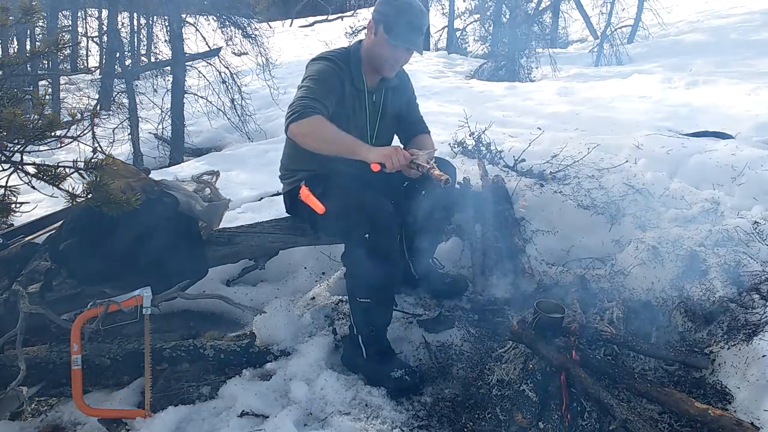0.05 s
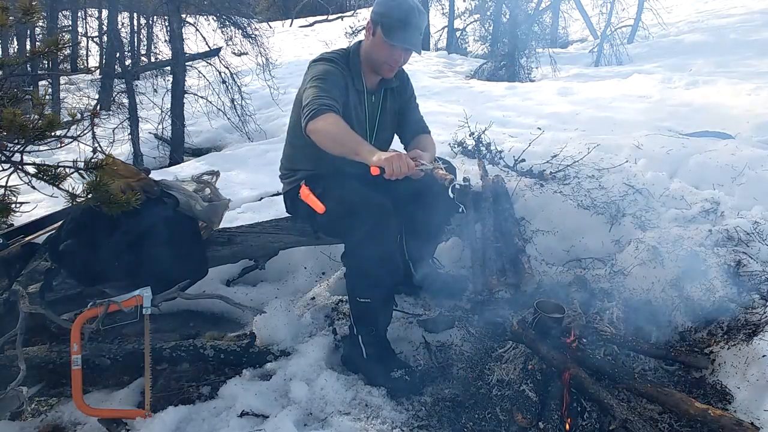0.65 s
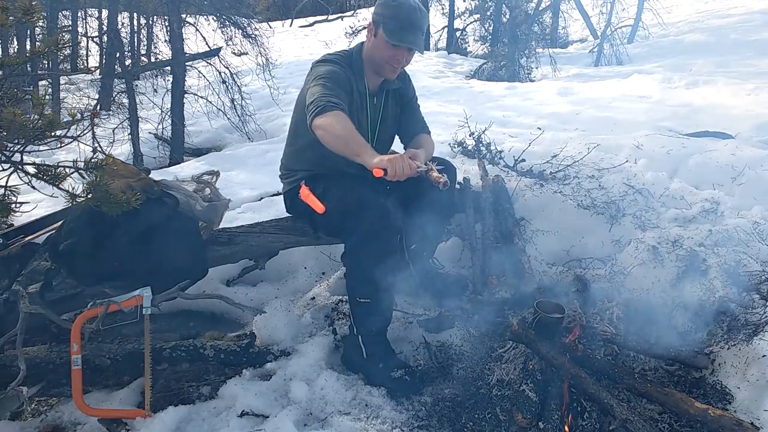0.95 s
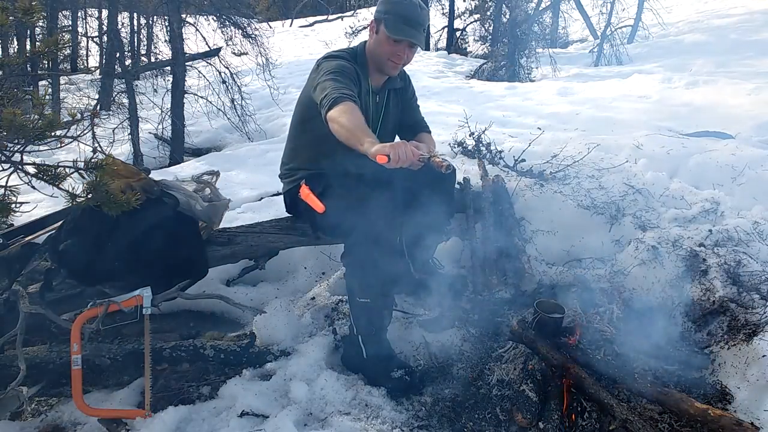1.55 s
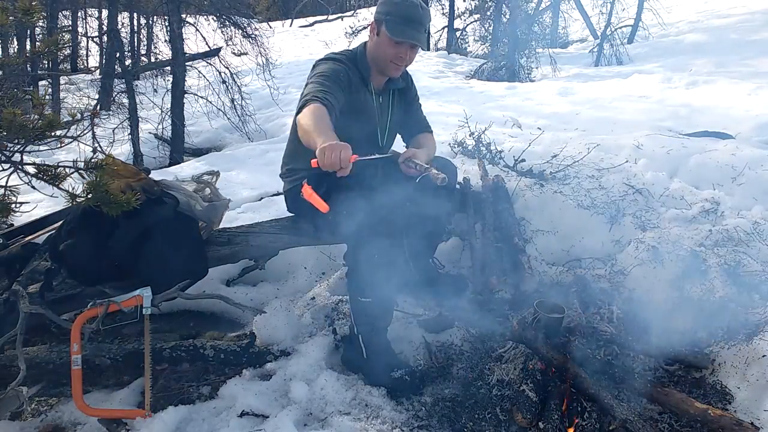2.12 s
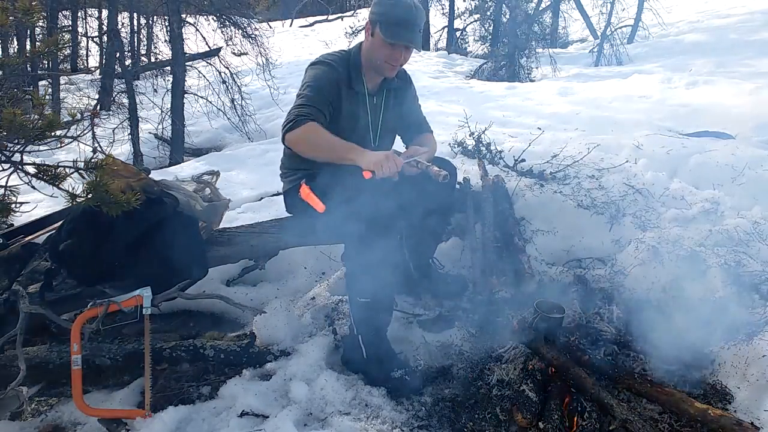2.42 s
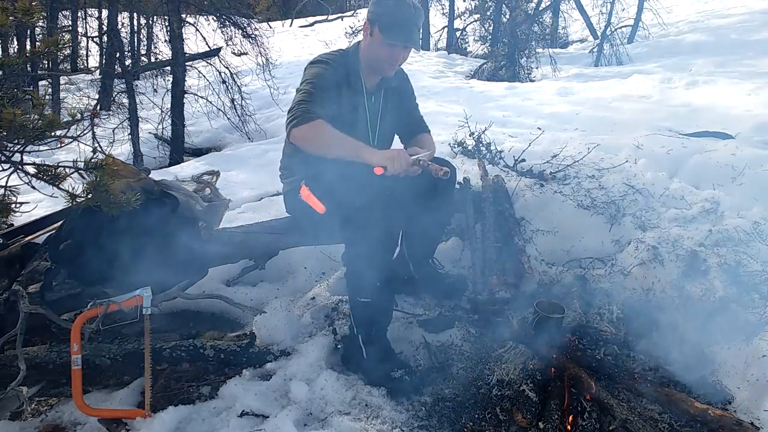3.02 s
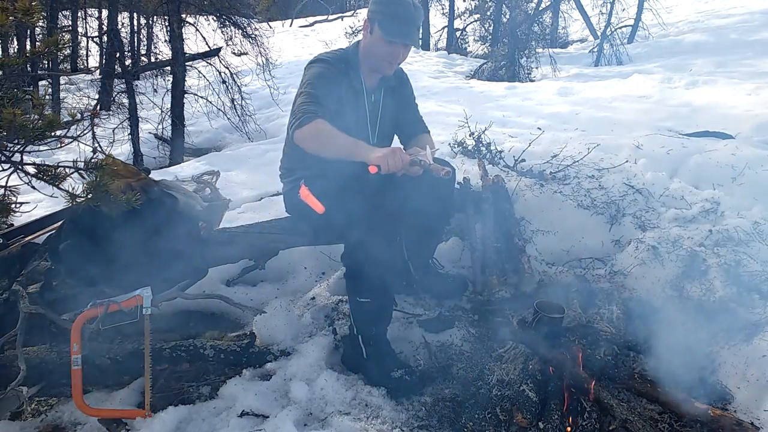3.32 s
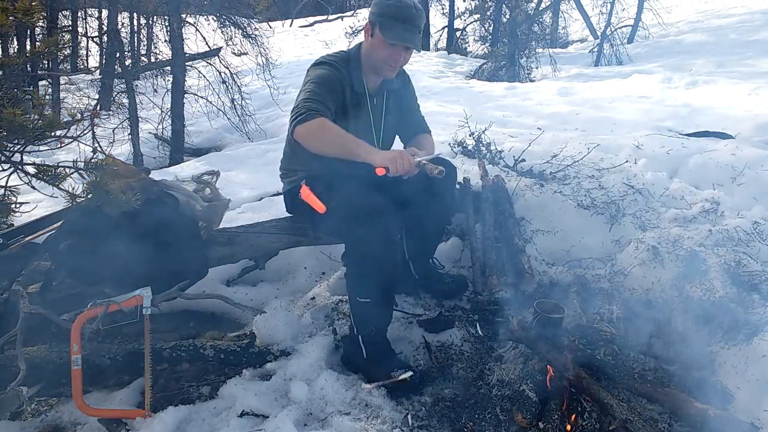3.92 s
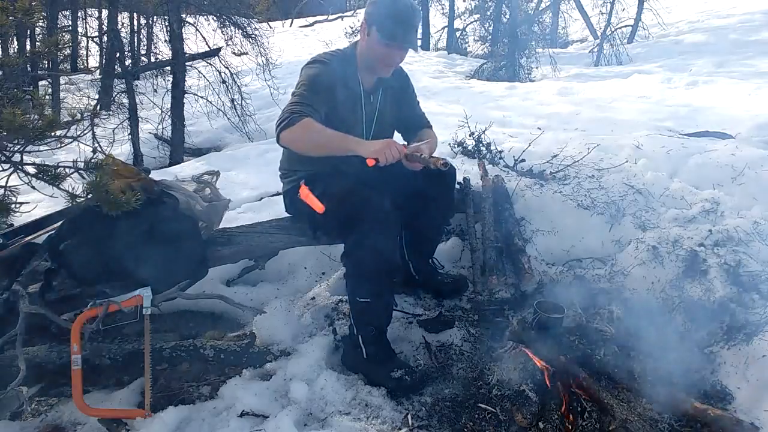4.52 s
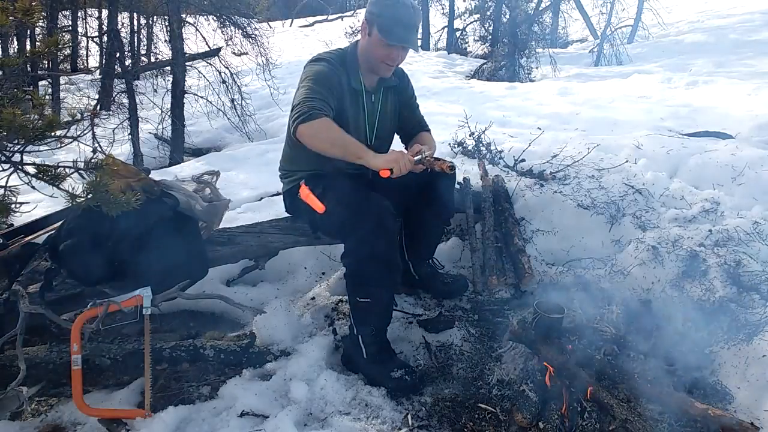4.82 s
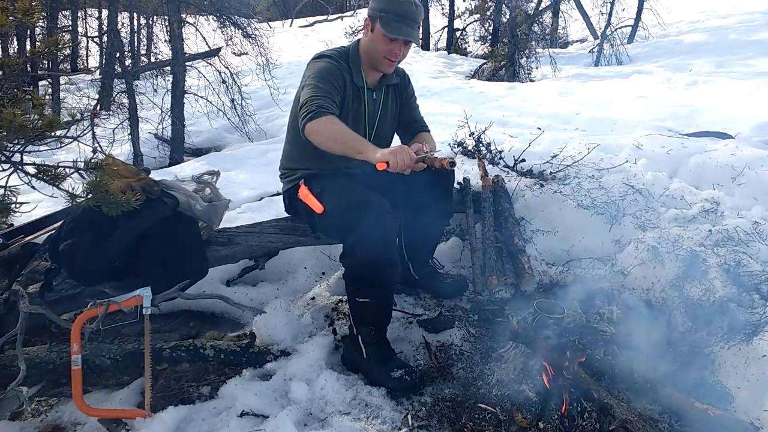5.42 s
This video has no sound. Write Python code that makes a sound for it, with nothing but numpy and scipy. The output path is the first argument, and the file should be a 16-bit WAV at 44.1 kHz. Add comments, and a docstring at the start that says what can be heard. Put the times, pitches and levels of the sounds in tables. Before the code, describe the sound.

Close to the microphone, a knife catches and slips along a wooden pole, making short hissing scrapes and dry knocks with pauses between them. Behind it runs the low, steady rush of a campfire in the open air, dotted with little pops. After a few light strokes a log splits with a loud snap, far above everything else, and the background briefly dips. Firmer strokes follow, and trousers rustle softly once.

```python
"""A knife knocks and scrapes on a wooden pole, shaving off bark over the soft rush of a campfire.
The blade sticks and slips: tearing fibres hiss, and the pole knocks, springs back and rings.
Pockets of steam pop in the fire, and the carver's trousers rustle once. Early on a log splits
with one loud crack, which makes a limiter turn everything down for about a second."""
import sys
import numpy as np
from scipy import signal
from scipy.fft import rfft, irfft
from scipy.io import wavfile
from scipy.ndimage import uniform_filter1d, minimum_filter1d

SR = 44100
rng = np.random.default_rng(int(sys.argv[2]) if len(sys.argv) > 2 else 0)


def transcribe(signal):
    """Save signal, clipped to [-1, 1], as a 16-bit WAV file at the path in sys.argv[1]."""
    frames = np.atleast_2d(signal).T
    limited = np.clip(frames, -1, 1)
    pcm = np.round(limited * 32767).astype(np.int16)
    wavfile.write(sys.argv[1], SR, pcm)


N = 244743
SIZE = 16384  # samples in one short sound
HZ, T = np.fft.rfftfreq(SIZE, 1 / SR), np.arange(SIZE) / SR

# the rush of flames and air: f/Hz, level/dB per Hz
AIR_SPECTRUM = [(20, -100), (60, -87.5), (130, -76.5), (250, -82), (450, -88), (1100, -91.5), (1800, -95),
                (2600, -92.5), (4000, -99), (8000, -101), (12000, -104.5), (15400, -105.5), (15800, -140)]
# how much the rush drifts: f/Hz, weight
AIR_DRIFT = [(1500, 0.55), (6000, 0.42)]
# how closely its left and right sides are linked: f/Hz, link from 0 to 1
AIR_LINK = [(40, 0.74), (150, 0.55), (400, 0.22), (1200, 1.0), (2500, 1.0), (5000, 0.65),
            (7500, 0.68), (11000, 0.23)]
# how much louder it is on the right: f/Hz, level/dB
AIR_BALANCE = [(300, 0.72), (4000, 0.99), (8000, 1), (13000, 2.5)]
# near sounds at two microphones: f/Hz, left's phase lead/rad, left over right level/dB
MIC_RESPONSE = [(0, -4.5, 0), (111, -1.53, -6), (279, 0.5, 4.5), (700, -0.23, 2.5), (1150, 0, -0.5),
                (1790, 0.38, -7.5), (2167, 2.5, -6), (2355, 3, 1), (3070, 5, 2), (3900, 7, 1.5),
                (5410, 10, 3), (6500, 13, 2.5), (7500, 15.5, 0), (9830, 20.5, 5.5), (16700, 34.5, -8)]
# steam pops: t/s, level/dB, ring f/Hz, fizz level/dB against the ring
STEAM_POPS = [(0.799, -39.5, 6000, -5), (1.0671, -32, 6130, -6), (1.250, -41.5, 6000, 0.5),
              (1.633, -46, 6000, -4), (1.898, -37.5, 3870, -7), (2.070, -11, 1130, -20),
              (2.122, -42, 5000, 0.5), (2.53, -36, 1420, -2.5), (2.629, -37.5, 680, -21),
              (3.258, -35.5, 4630, 0.5), (3.438, -34.5, 4500, -1.5), (4.634, -44.5, 1220, -1),
              (5.068, -43.5, 1620, -12), (5.3165, -31.5, 3600, 1)]
# the tone of a splitting log: f/Hz, level/dB
CRACK_SPECTRUM = [(50, -38), (130, -15), (220, 0), (330, 2.5), (680, 9.5), (1400, 10), (2100, 2),
                  (3100, 5.5), (4500, -5.5), (6200, 0), (8000, 6), (11500, 1.5), (15500, -10.5)]
# the pole's dull body: f/Hz, level/dB
WOOD_SPECTRUM = [(30, -48), (150, -17.5), (300, -7.5), (480, -2.5), (800, -3), (1400, -3), (2000, -8),
                 (2400, -10), (2900, -16), (3800, -24.5), (5000, -20), (9000, -56), (16000, -40)]
# the notes the pole rings at: f/Hz, width/Hz, level/dB over its body
POLE_NOTES = [(504.5, 27, 5), (600, 27, 11), (722, 48, 5.5), (930, 62, 3), (1218.5, 26, 10.5),
              (1420, 63, 2.5), (1530, 51, -5), (1736, 67, 6.5), (2100, 49, 8.5), (3020, 230, 9.5),
              (3610, 210, 11.5)]
# the hiss of tearing fibres: f/Hz, level/dB
FIBRE_SPECTRUM = [(40, -52), (400, -27), (1200, -9.5), (2400, 0.5), (3300, 2.5), (4300, 1.5), (5500, -2.5),
                  (6100, 0.5), (7200, -2), (9000, -2), (12500, -4.5), (15200, -6), (16000, -27)]
# the blade slides along: peak t/s, rise/s, wood level/dB, fibre level/dB, boosted f/Hz
BLADE_SHAVES = [(.212, .022, -50, -52, 620), (.514, .021, -44, -46, 1300), (.955, .006, -52, -50.5, 1200),
                (2.029, .017, -24, -45.5, 1220), (2.718, 0.038, -48, -46.5, 1400),
                (2.779, .03, -33, -38.5, 1260), (3.129, .015, -39.5, -39.5, 1430),
                (3.341, .004, -55, -44.5, 1880), (3.546, .021, -31, -45.5, 580),
                (4.034, .017, -38, -39, 1240), (4.83, .03, -57.5, -60, 1190),
                (4.950, .01, -48, -43.5, 1200), (5.493, .021, -26.5, -43.5, 1280),
                (5.519, .012, -43.5, -43.5, 1430)]
# the edge catches and a splinter snaps: t/s, wood level/dB, fibre level/dB
BLADE_CATCHES = [(.207, -52, -45), (.531, -38, -38), (.966, -39.5, -38.5), (1.101, -66, -42.5),
                 (2.012, -26, -22.5), (2.681, -47, -38.5), (2.729, -48, -43), (2.760, -33, -29),
                 (3.165, -44, -42), (3.503, -49, -47), (3.522, -32.5, -29.5), (4.011, -38, -41.5),
                 (4.047, -43, -34), (4.791, -48.5, -47), (5.457, -25, -33), (5.472, -36, -43),
                 (5.487, -24, -38)]
# the blade jolts the pole: t/s, level/dB, tilt/dB per octave, boosted f/Hz, rebound's boosted f/Hz
POLE_KNOCKS = [(.1805, -38, -6, 607, 620), (.864, -41.5, -.5, 1190, 1180), (.9705, -28, -4.5, 620, 606),
               (2.651, -48.5, -3, 1210, 600), (3.073, -21.5, 2, 1650, 600), (3.1675, -34.5, -.5, 1260, 577),
               (3.4645, -39, -4, 600, 915), (3.946, -44.5, -10.5, 450, 450), (4.052, -16.3, 6, 1900, 490),
               (4.680, -51.5, 1, 490, 490), (4.954, -36.5, -4.5, 940, 430), (5.308, -43.5, -2.5, 600, 720)]


def amp(db):
    """Turns decibels into a gain."""
    return 10 ** (np.asarray(db) / 20)


def unit_rms(x):
    """Scales a signal to an average power of 1."""
    return x / np.sqrt(np.mean(x ** 2) + 1e-20)


def curve(points, hz):
    """Joins a table's points along a log-frequency axis."""
    f, value = np.transpose(points)
    return np.interp(np.log(hz + 1), np.log(f + 1), value)


def add(mix, s, sound):
    """Mixes a sound in, starting at s seconds."""
    start = round(s * SR)
    sound = sound[max(-start, 0):]
    part = mix[max(start, 0):][:len(sound)]
    part += sound[:len(part)]


def colour(x, db):
    """Sets the level of each frequency so that notes ring after a blow, never before."""
    cepstrum = irfft(np.log(amp(db)))
    cepstrum[1:SIZE // 2] *= 2
    cepstrum[SIZE // 2 + 1:] = 0
    return irfft(rfft(x) * np.exp(rfft(cepstrum)))


def slips(per_s, spread_db, smear):
    """Surfaces stick and slip: tiny uneven clicks over smooth rubbing."""
    sizes = amp(spread_db * np.minimum(rng.exponential(1, SIZE), 3)) * rng.choice([-1, 1], SIZE)
    clicks = sizes * (rng.random(SIZE) < per_s / SR)
    return unit_rms(clicks) + smear * rng.standard_normal(SIZE)


def rub(drive, body_db, smooth_hz=350):
    """Slips shake a body: their own tone is evened out and the body's takes over."""
    power = uniform_filter1d(abs(rfft(drive)) ** 2, size=max(int(smooth_hz / HZ[1]), 1))
    return unit_rms(colour(drive, body_db - 10 * np.log10(abs(power) + 1e-9)))


def microphones(x):
    """A near sound reaches left and right with a shift in phase and level."""
    f, lead, balance_db = np.transpose(MIC_RESPONSE)
    lead, balance_db = np.interp(HZ, f, lead), np.interp(HZ, f, balance_db)
    pair = irfft([amp(balance_db / 2), amp(-balance_db / 2) * np.exp(-1j * lead)])
    middle = SIZE // 2 + 1
    return signal.fftconvolve(x[None], np.roll(pair, middle, axis=1), axes=1)[:, middle:middle + N]


def echoes(x, db, t60, low_hz):
    """A spray of reflections, different on each side, fading by 60 dB in t60 seconds."""
    taps = rng.standard_normal((2, SIZE)) * amp(-60 * T / t60) * (1 - np.exp(-T / (t60 / 20)))
    bass_cut = signal.butter(1, low_hz, "high", fs=SR, output="sos")
    taps = signal.sosfilt(bass_cut, taps / np.linalg.norm(taps[0]))
    return amp(db) * signal.fftconvolve(x[None], taps, axes=1)[:, :N]


def air(patch_depth=2.5, swell_depth=2.0, comb_hz=2500):
    """Flames and open air make a soft rush that drifts in patches."""
    frames, hz = N // 256 + 5, np.fft.rfftfreq(1024, 1 / SR)
    a, b, c, d, patches = rng.standard_normal((5, frames, len(hz)))
    patches = unit_rms(uniform_filter1d(uniform_filter1d(patches, size=9, axis=0), size=12, axis=1))
    swell = unit_rms(uniform_filter1d(rng.standard_normal(frames), size=50))[:, None]
    # the rush is alike, then opposite, at the two sides from band to band
    alike = -np.cos(2 * np.pi * hz / comb_hz) * curve(AIR_LINK, hz)
    left = a + 1j * b
    right = alike * left + np.sqrt(1 - alike ** 2) * (c + 1j * d)
    drift_db = curve(AIR_DRIFT, hz) * (patch_depth * patches + swell_depth * swell)
    side_db = np.array([-.5, .5])[:, None, None] * curve(AIR_BALANCE, hz)
    spectra = np.array([left, right]) * amp(curve(AIR_SPECTRUM, hz) + drift_db + side_db)
    _, rush = signal.istft(spectra.swapaxes(1, 2), nperseg=1024, noverlap=768)
    return np.sqrt(SR * 3 / 2048) * rush[:, :N]


def trousers(s=4.27, db=-61, hz=1150):
    """Cloth rustles softly as the carver shifts his leg."""
    cloth_db = -10 * np.log10(1 + (np.log2((HZ + 1) / hz) / 0.41) ** 4)
    rustle = rub(slips(per_s=600, spread_db=3, smear=0.68), cloth_db)
    out = np.zeros(N)
    add(out, s, amp(db) * rustle * signal.windows.tukey(SIZE, .7))
    return out


def pop(db, ring_hz, t60, fizz_db, fizz_s=0.0016, snap_db=-9, snap_hz=3700, soft_hz=9000):
    """A pocket of steam bursts: charred wood snaps, the hollow rings and steam fizzes."""
    t = T[:SIZE // 8]
    ring = np.sin(2 * np.pi * ring_hz * t) * amp(-60 * t / t60)
    snap = np.sin(2 * np.pi * snap_hz * t) * np.exp(-t / 0.00035)
    fizz = rng.standard_normal(len(t)) * np.exp(-t / fizz_s)
    burst = ring + amp(snap_db) * snap + amp(fizz_db) * fizz
    return amp(db) * signal.lfilter(*signal.butter(1, soft_hz, fs=SR), burst)


def crack(energy_db=16, gap_s=0.0001116, second_db=-5, spit_db=-38, spit_s=0.00098):
    """A log splits in two quick snaps and spits a little steam."""
    spit = amp(spit_db) * rng.standard_normal(SIZE) * np.exp(-T / spit_s)
    snaps = irfft(1 - amp(second_db) * np.exp(-2j * np.pi * HZ * gap_s))
    sound = colour(snaps + spit, curve(CRACK_SPECTRUM, HZ))
    return amp(energy_db) * sound / np.linalg.norm(sound)


def fire(ticks=60, faint_db=-56):
    """Burning logs give one loud crack, clear pops and faint ticks at random times."""
    out = np.zeros(N)
    add(out, 1.3837, crack())
    for s, db, hz, fizz_db in STEAM_POPS:
        t60 = 0.0089 * (hz / 1000) ** -0.74  # smaller hollows ring higher and die sooner
        add(out, s, pop(db, hz, t60, fizz_db))
    for when, size, pitch in rng.random((ticks, 3)):
        add(out, when * N / SR, pop(faint_db + 11 * size ** 2, 900 * 8 ** pitch, t60=.003, fizz_db=-20))
    return out


def bite(mix, s, rise_s, fall_s, wood_db, fibre_db, tilt, pitch_hz, early_s=0):
    """Adds one bite of the blade: a swell of slips shakes the pole and another tears its fibres."""
    peak_s = SIZE // 3 / SR
    t = T - peak_s
    force = np.exp(-np.maximum(-t / rise_s, t / fall_s) ** 1.27)
    # the tearing stops first, as the shaving comes free
    tear = np.exp(-np.maximum(-(t + early_s) / rise_s, (t + early_s) / (0.85 * fall_s)) ** 1.32)
    notes = sum(amp(db) ** 2 / (1 + (2 * (HZ - hz) / width) ** 2) for hz, width, db in POLE_NOTES)
    pole_db = curve(WOOD_SPECTRUM, HZ) + 10 * np.log10(1 + notes)
    pole_db += tilt * np.log2(np.clip(HZ, 250, 2500))
    # where the blade sits on the pole decides which notes are boosted
    boost_db = 6 * np.exp(-(np.log2((HZ + 1) / pitch_hz) / 0.18) ** 2)
    wood = rub(force * slips(per_s=1500, spread_db=3, smear=0.35), pole_db + boost_db)
    # a hard tear lifts coarser splinters, which sound darker
    coarse_db = 0.23 * (fibre_db + 39.5) * np.log2(np.maximum(HZ, 3000))
    hiss_db = curve(FIBRE_SPECTRUM, HZ) - coarse_db + boost_db
    fibre = rub(tear * slips(per_s=900, spread_db=5.3, smear=0.35), hiss_db, smooth_hz=1220)
    sound = amp(wood_db) * wood + amp(fibre_db) * fibre
    add(mix, s - peak_s, sound * np.sqrt(np.mean(force ** 2)))


def knife(knock_rise_s=.0018, knock_fibre_db=-29, rebound_s=.0075):
    """The blade shaves, catches and knocks; after each knock the pole springs back in the hand."""
    out = np.zeros(N)
    for s, rise_s, wood_db, fibre_db, hz in BLADE_SHAVES:
        bite(out, s, rise_s, .014, wood_db, fibre_db, tilt=.3, pitch_hz=hz, early_s=.0038)
    for s, wood_db, fibre_db in BLADE_CATCHES:
        bite(out, s, .0025, .0051, wood_db, fibre_db, tilt=-1, pitch_hz=1450)
    for s, db, tilt, hz, back_hz in POLE_KNOCKS:
        bite(out, s, knock_rise_s, .0046, db, db + knock_fibre_db, tilt, hz)
        # the rebound is softer and duller; a sharp jolt moves the pole less
        back_db = db - 5 - .9 * max(tilt, 0)
        bite(out, s + rebound_s, knock_rise_s, .0072, back_db, back_db + knock_fibre_db,
             tilt=min(tilt, 0) - 5, pitch_hz=back_hz)
    return out


def scene():
    """Knife and fire, with close echoes off hands and logs and faint ones from the trees."""
    blade, pops = knife(), fire()
    close = echoes(blade, db=-7.5, t60=0.015, low_hz=2570) + echoes(pops, db=-18, t60=0.0076, low_hz=900)
    trees = echoes(blade, db=-20.5, t60=0.24, low_hz=400) + echoes(pops, db=-31, t60=0.12, low_hz=400)
    return microphones(blade + pops + trousers()) + close + trees + air()


def record(dry, ceiling_db=1.1, recovery_db_per_s=6.5, top_hz=15900):
    """A limiter ducks at once on a peak and recovers slowly; peaks are rounded, the top treble cut."""
    peak_db = 20 * np.log10(abs(dry).max(0) + 1e-9)
    recovery_db = np.arange(N) / SR * recovery_db_per_s
    held_db = np.maximum.accumulate(peak_db + recovery_db) - recovery_db
    over_db = np.maximum(held_db - ceiling_db, 0)
    gain_db = uniform_filter1d(minimum_filter1d(-over_db, size=65), size=65)
    squashed = np.tanh(dry * amp(gain_db))
    treble_cut = signal.firwin(255, top_hz, window=("kaiser", 9), fs=SR)
    return signal.oaconvolve(squashed, treble_cut[None], "same")


dry = scene()
out = record(dry)
transcribe(out)
```